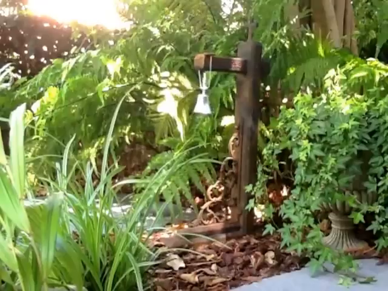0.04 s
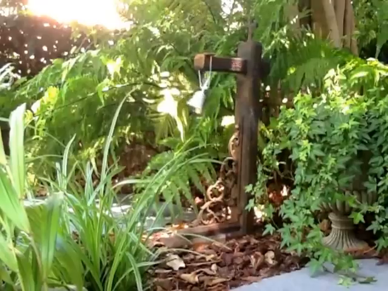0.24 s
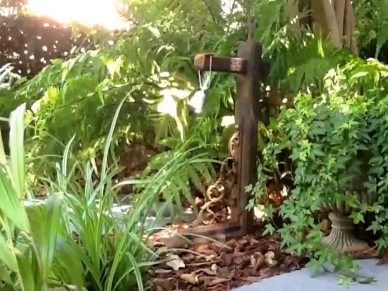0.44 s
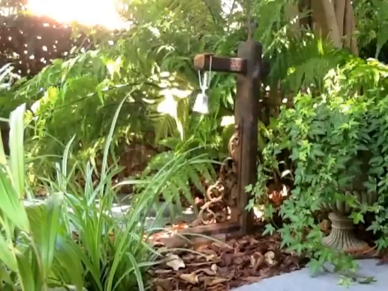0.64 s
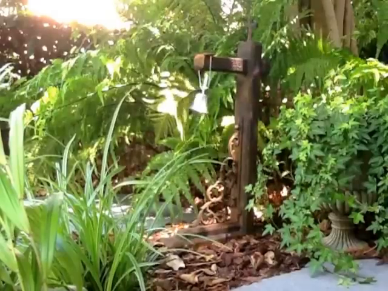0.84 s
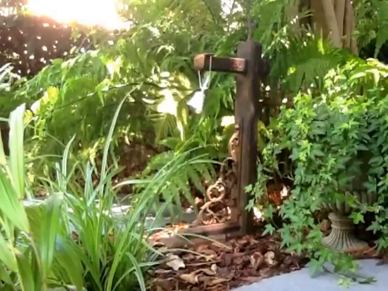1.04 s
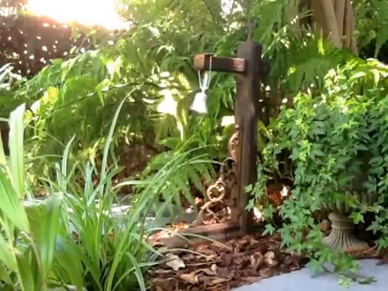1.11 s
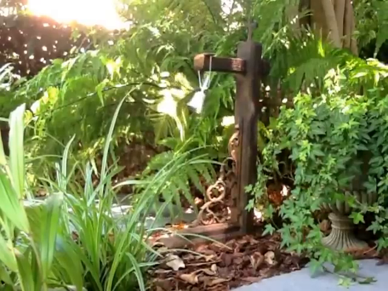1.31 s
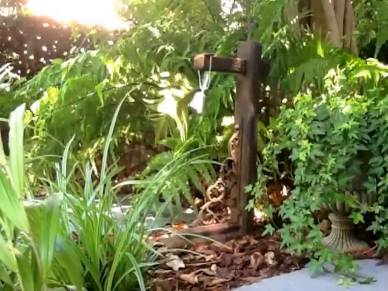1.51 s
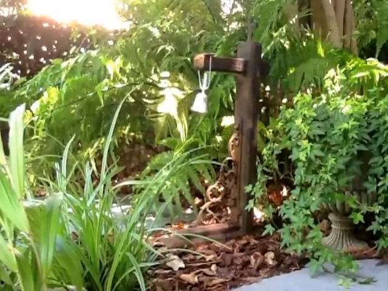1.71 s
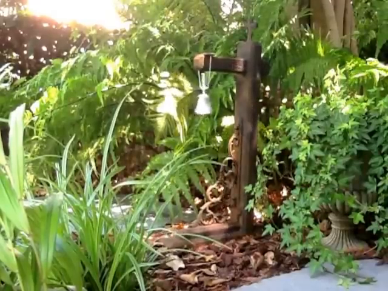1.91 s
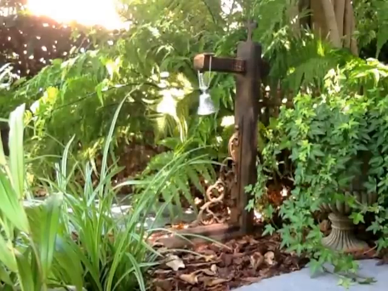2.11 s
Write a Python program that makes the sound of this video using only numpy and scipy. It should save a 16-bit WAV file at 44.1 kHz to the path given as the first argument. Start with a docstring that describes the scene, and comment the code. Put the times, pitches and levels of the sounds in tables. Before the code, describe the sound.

Seven quick, high strikes of a small swinging bell over a faint outdoor hum.

```python
"""Small bell in a quiet garden

A metal bell swings on a wooden post; its clapper strikes seven times, on alternate sides.
Each blow is a hard tick and a ring of paired modes that beat against each other.
One microphone hears it directly, with faint echoes from the post, ground and plants close by.
Far off, the murmur of the town slowly fades, along with a faint hiss."""
import sys
import numpy as np
from scipy import signal
from scipy.fft import rfft, irfft
from scipy.io import wavfile
from scipy.ndimage import map_coordinates

SR = 44100
rng = np.random.default_rng(int(sys.argv[2]) if len(sys.argv) > 2 else 0)


def materialize(psi):
    """Save the field psi as 16-bit PCM at rate SR to the path in sys.argv[1].

    A 1-D psi becomes a single channel; in a 2-D psi each row is a channel.
    """
    bounded = np.clip(np.atleast_2d(psi).T, -1, 1)
    quanta = np.round(bounded * 32767).astype(np.int16)
    wavfile.write(sys.argv[1], SR, quanta)


N = 94815

# Clapper blows: start_s, strength_db, then the extra gain each gives to parts of the sound:
# low_modes_db, loudest_mode_db, upper_twins_db, tick_db
CLAPPER_BLOWS = [(0.2165, -4.5, 3.5, 1.5, 0, 6), (.4502, -4, 2, -2, 2, 9),
                 (0.7293, -1.5, -5.5, 1, -5.5, -5), (1.0024, -1, 1, -2.5, -3, 4.5),
                 (1.2726, -2.5, -5.5, -1, -5.5, 1.5), (1.5345, -1, 0, -5.5, 1, 3),
                 (1.7956, -7.5, 3.5, -0.5, 5, 11)]
# The bell's modes: pitch_hz
MODE_PITCHES = [4572, 6353, 7721, 9061.5, 10499, 10626, 10699, 11202, 13921]
# The same modes, each with a detuned twin:
# level_db, t60_s, twin_offset_hz, twin_relative_db, twin_t60_s, swell_s
MODE_PAIRS = [(-41, 1.92, 3, -0.5, 1.06, 0.098), (-53.5, 1.42, -2.5, -7, 1.6, 0.09),
              (-37, 0.51, -12, -3.5, 1.07, 0.046), (-20, 0.45, 11.5, -10, 0.51, 0.05),
              (-48, 0.24, -2, -14, .3, 0.041), (-31.5, 0.17, -8.5, -4, .12, 0.043),
              (-33, 0.2, 21, -8, 0.11, 0.025), (-26.5, 0.35, 16.5, -13, 0.74, 0.039),
              (-20, 0.12, -7, -12, 0.22, 0.065)]
# Spectrum of the clapper's tick: frequency_hz, relative_db
TICK_SPECTRUM = [(2800, 9), (3600, -24), (4300, -8.5), (6000, -8.5), (7500, -0.5), (9300, -1), (11000, -2),
                 (12300, -14.5), (14000, -15.5), (15300, 2.5)]
# Echoes from surfaces near the bell: delay_s, level_db, swing_share
NEAR_ECHOES = [(.0031, -20, -0.82), (.0094, -16, 1), (.021, -37.5, -.8)]
# Spectrum of the distant town: frequency_hz, relative_db
TOWN_SPECTRUM = [(15, -69), (25, -60), (49, -74), (65, -22), (101, -19.5), (146, -5), (188, 0), (213, -7.5),
                 (246, 3), (297, -6), (336, -5), (414, -11), (554, -10), (741, -13.5), (1120, -11.5),
                 (1440, -11.5), (3600, -35), (4680, -70), (7920, -120)]
# Low resonances in the town's murmur: pitch_hz, width_hz, level_db
TOWN_RESONANCES = [(175, 16.4, -85.5), (204.5, 12.5, -64.5), (245.2, 5.5, -59), (568, 4.2, -75)]
# Spectrum of the high hiss: frequency_hz, relative_db
HISS_SPECTRUM = [(1000, -43), (1800, 18), (3500, 6.5), (6000, 5), (10000, -0.5), (12000, -4), (15000, -16)]


def bell_ring(t, gain_db=2, contact_s=0.00072, ring_kept=0.25):
    """Each blow checks the old ring and restarts the mode pairs, which swell into step and beat."""
    ring = np.zeros(N)
    for start, strength_db, low_db, loudest_db, twins_db, _ in CLAPPER_BLOWS:
        age = np.maximum(t - start, 0)
        contact = np.sin(np.pi / 2 * np.minimum(age / contact_s, 1)) ** 2
        ring *= 1 - contact * (1 - ring_kept)
        for k, (hz, pair) in enumerate(zip(MODE_PITCHES, MODE_PAIRS)):
            mode_db, t60, offset_hz, twin_db, twin_t60, swell_s = pair
            is_low, is_loudest = k < 2, k == 3
            level = undb(gain_db + strength_db + mode_db + low_db * is_low + loudest_db * is_loudest)
            # No two blows land on quite the same spot.
            spot_db, spot_s = rng.uniform(-6, 6), rng.uniform(-0.014, 0.014)
            if not is_low:
                twin_db += twins_db + spot_db
            phase = 2 * np.pi * (hz * age + rng.random())
            beat = 2 * np.pi * offset_hz * (age - swell_s - spot_s)
            mode = fade(age, t60) * np.sin(phase)
            twin = undb(twin_db) * fade(age, twin_t60) * np.sin(phase + beat)
            ring += level * contact * (mode + twin)
    return ring


def clapper_ticks(t, low_cut_hz=4020):
    """Metal meets metal with a short, thin crack, which the plants scatter."""
    crack, scatter = np.zeros((2, N))
    for start, strength_db, *_, tick_db in CLAPPER_BLOWS:
        crack += undb(strength_db + tick_db) * fade(t - start, t60=0.018)
        scatter += undb(strength_db) * fade(t - start, t60=0.06)
    ticks = undb(-26) * crack * coloured(TICK_SPECTRUM)
    ticks += undb(-34.5) * scatter * coloured(TICK_SPECTRUM)
    return signal.sosfilt(signal.butter(8, low_cut_hz, "high", fs=SR, output="sos"), ticks)


def bell_swing(t, reach_m=0.0052, dip_db=-1.5):
    """The bell moves to and from the microphone, and dips in level as it turns away once a swing."""
    starts = [blow[0] for blow in CLAPPER_BLOWS]
    half_swings = np.polyval(np.polyfit(starts, np.arange(len(starts)), 1), t)  # one per blow
    lag_s = reach_m * np.cos(np.pi * half_swings) / 343  # sound travels at 343 m/s
    turn_at, turn_width = 0.887, 0.055  # in half swings
    from_turn = (half_swings - turn_at + 1) % 2 - 1
    turned_away = np.exp(-(from_turn / turn_width) ** 2)
    return lag_s, undb(dip_db * turned_away)


def garden(ring, ticks, t, tail_db=-15.5):
    """The swing shifts the direct path against the near echoes; the ring leaves a thin, diffuse tail."""
    def delayed(x, delay_s):
        return map_coordinates(x, [(t - delay_s) * SR], order=5)

    lag_s, turn_gain = bell_swing(t)
    bell = ring + ticks
    direct = delayed(bell, lag_s)
    echoes = sum(undb(db) * delayed(bell, delay_s + share * lag_s) for delay_s, db, share in NEAR_ECHOES)
    response = rng.standard_normal(N) * fade(t, t60=0.38)
    tail = signal.fftconvolve(delayed(ring, -lag_s), response / np.linalg.norm(response))[:N]
    return turn_gain * (direct + echoes + undb(tail_db) * tail)


def distant_town(t, murmur_db_per_s=-2.5, drone_db_per_s=-3.5, top_hz=3600):
    """The town from far off: a low murmur and a few droning resonances, slowly ebbing."""
    drone = np.zeros(N)
    for hz, width_hz, db in TOWN_RESONANCES:
        drone += undb(db + drone_db_per_s * t) * noise(lambda f: 1 / (1 + ((f - hz) / width_hz) ** 2))
    murmur = undb(-48 + murmur_db_per_s * t) * coloured(TOWN_SPECTRUM)
    return signal.sosfilt(signal.butter(4, top_hz, fs=SR, output="sos"), murmur + drone)


def faint_hiss(t, db_per_s=-5):
    """A high hiss dies away behind everything else."""
    return undb(-56 + db_per_s * t) * coloured(HISS_SPECTRUM)


def undb(db):
    """Decibels to amplitude."""
    return 10 ** (np.asarray(db) / 20)


def fade(t, t60):
    """Exponential decay from t = 0, falling 60 dB in t60 seconds."""
    return (t >= 0) * np.exp(-np.log(1000) * np.maximum(t, 0) / t60)


def noise(gain):
    """Noise of rms 1 whose spectrum follows gain(Hz)."""
    hz = np.maximum(np.fft.rfftfreq(N, 1 / SR), 1)
    x = irfft(rfft(rng.standard_normal(N)) * gain(hz), N)
    return x / x.std()


def coloured(points):
    """Noise of rms 1 shaped by (Hz, dB) points, falling away below the first."""
    hz, db = np.array(points).T
    return noise(lambda f: undb(np.interp(np.log(f), np.log(hz), db)) * np.minimum(f / hz[0], 1) ** 2)


def scene():
    """The bell in its garden and the town beyond, at one microphone."""
    t = np.arange(N) / SR
    bell = garden(bell_ring(t), clapper_ticks(t), t)
    return (bell + distant_town(t) + faint_hiss(t))[None]


def record(dry):
    """The recorder cuts the top steeply."""
    top_hz = 15250
    return signal.sosfilt(signal.ellip(12, 0.2, 60, top_hz, fs=SR, output="sos"), dry)


dry = scene()
out = record(dry)
materialize(out)
```